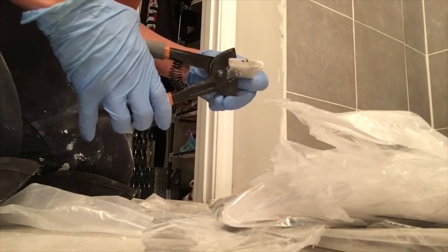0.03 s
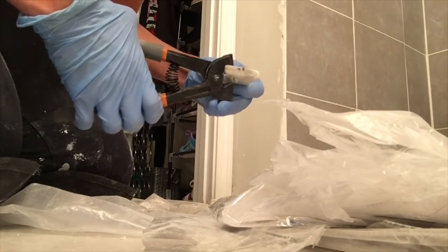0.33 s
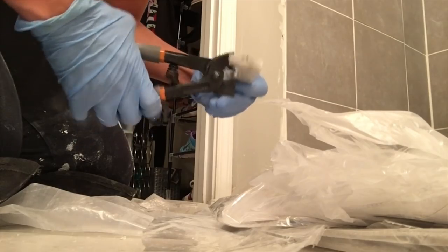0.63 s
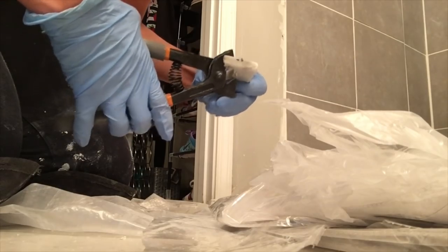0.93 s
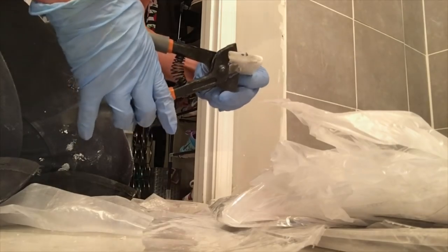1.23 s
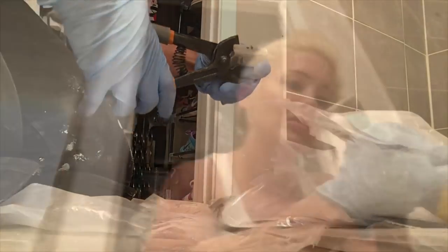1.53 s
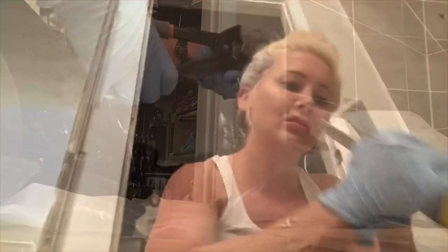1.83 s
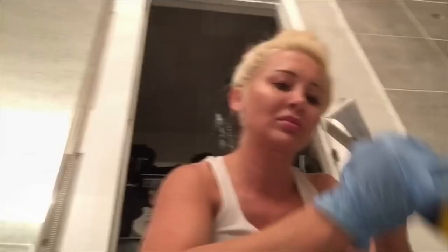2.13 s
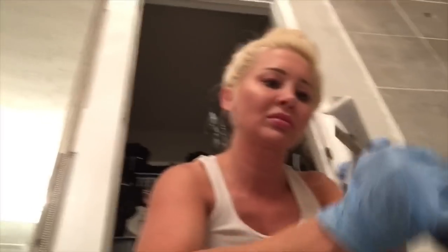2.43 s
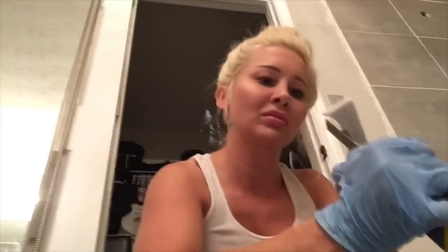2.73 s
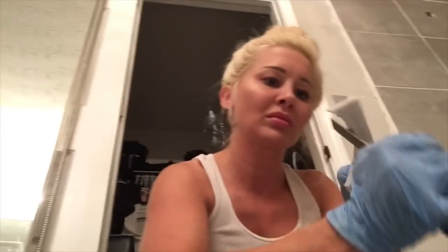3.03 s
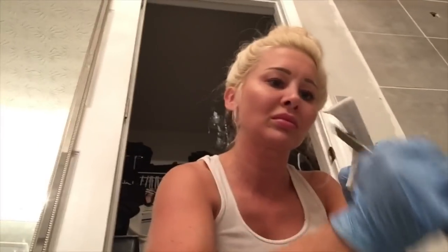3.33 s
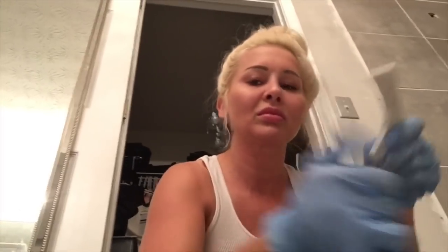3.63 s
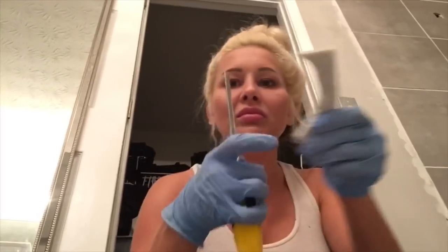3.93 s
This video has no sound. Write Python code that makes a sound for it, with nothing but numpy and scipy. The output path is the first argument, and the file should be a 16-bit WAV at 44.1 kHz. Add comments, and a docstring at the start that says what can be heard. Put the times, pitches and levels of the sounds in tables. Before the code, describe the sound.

A steel file rasps quickly back and forth on a hard piece after one sharp snap.

```python
"""Snip and file

Hand cutters snap a hard, brittle piece; a few crumbs tick and rubber gloves rustle.
Then a steel file rasps back and forth over it, about seven strokes a second, and knocks as it leaves.
Its teeth catch in grains that ring the piece and the blade; a small tiled room answers over a low air hum."""
import sys
import numpy as np
from scipy import signal
from scipy.fft import rfft, irfft
from scipy.io import wavfile
from scipy.ndimage import uniform_filter1d, map_coordinates

SR = 44100
rng = np.random.default_rng(int(sys.argv[2]) if len(sys.argv) > 2 else 0)


def waveform_to_disk(signal):
    """Save audio, clipped to [-1, 1], as 16-bit WAV at the path in sys.argv[1]."""
    frames = np.transpose(np.atleast_2d(signal))
    scaled = np.clip(frames, -1, 1) * 32767
    samples = np.round(scaled).astype(np.int16)
    wavfile.write(sys.argv[1], SR, samples)


N = 176400
TIME = np.arange(N) / SR


def amp(db):
    """Decibels to gain."""
    return 10 ** (np.asarray(db) / 20)


def unit(x):
    """Scale to rms 1."""
    return x / np.sqrt(np.mean(x ** 2) + 1e-20)


def along(points, hz):
    """Read a curve of (f/Hz, value) points on a log frequency axis."""
    f, values = np.transpose(points)
    return np.interp(np.log(hz + 1), np.log(f + 1), values)


def wobble(rate):
    """A smooth random modulator, rate knots a second."""
    return map_coordinates(rng.standard_normal(N), [np.arange(N) * rate / SR])


def decay(start, t60):
    """An envelope with instant attack and exponential decay."""
    age = TIME - start
    return (age >= 0) * amp(-60 * abs(age) / t60)


def filtered(x, response):
    """Apply a frequency response, scaled to keep the power of white noise."""
    h = response(np.fft.rfftfreq(2 * N, 1 / SR))
    return irfft(rfft(x, 2 * N) * h / np.sqrt(np.mean(abs(h) ** 2)))[:N]


def eq(x, points):
    """Minimum-phase EQ through (f/Hz, level/dB) points."""
    def response(hz):
        cepstrum = irfft(np.log(amp(along(points, hz))))
        return np.exp(rfft(2 * cepstrum[:N], 2 * N) - cepstrum[0])
    return filtered(x, response)


def resonate(x, modes, order=1):
    """A resonator bank of (f/Hz, width/Hz, level/dB) rows; order 2 has steeper skirts."""
    def response(f):
        return sum(amp(db) * (1j * f * width / (hz * hz - f * f + 1j * f * width)) ** order
                   for hz, width, db in modes)
    return filtered(x, response)


def shifted(x, by_hz):
    """Frequency shifter: slide a ring up or down, sample by sample."""
    return np.real(signal.hilbert(x) * np.exp(2j * np.pi * np.cumsum(by_hz) / SR))


def soft_contact(x, cutoff_hz=7070):
    """The contact is not perfectly hard, so the highest ringing is weak."""
    return signal.sosfilt(signal.butter(6, cutoff_hz, fs=SR, output="sos"), x)


# Room tone EQ: f/Hz, level/dB
AIR_EQ = [(20, -19), (35, -18), (55, -1.5), (75, -9.5), (110, -2), (155, -7), (185, -2.5), (240, -11.5),
          (380, -4), (550, -14.5), (900, -16), (1500, -21.5), (2300, -28), (4400, -31.5), (8000, -38),
          (16000, -46)]

def air(level_db=-57.5):
    """A steady bed of low, humming air."""
    return amp(level_db) * unit(eq(rng.standard_normal(N), AIR_EQ))


# Reverb time of the tiled room: f/Hz, t60/s
ROOM_DECAY = [(200, 0.21), (1000, 0.39), (3000, 0.39), (6000, 0.36), (9000, 0.31), (14000, 0.28)]

def room(x, tail_db, early_db=-8):
    """Near tiles throw early reflections; the tail lasts longest in the mids."""
    hz, t, spectrum = signal.stft(rng.standard_normal(SR), SR, nperseg=256)
    damping = amp(-60 * t / along(ROOM_DECAY, hz)[:, None])
    tail = signal.istft(spectrum * damping, SR, nperseg=256)[1][:SR]
    tail *= np.clip(TIME[:SR] / 0.0056, 0, 1)  # fade-in
    early = rng.standard_normal(SR) * (rng.random(SR) < .03) * decay(.002, t60=0.026)[:SR]
    impulse = amp(tail_db) * tail / np.linalg.norm(tail) + amp(early_db) * early / np.linalg.norm(early)
    return x + signal.fftconvolve(x, impulse)[:N]


# Glove moves: centre t/s, half length/s, level/dB, f/Hz
GLOVE_MOVES = [(0.185, .06, -75, 3480), (0.423, 0.022, -66, 6500), (0.788, 0.052, -62.5, 6800),
               (3.83, 0.051, -59.5, 800), (3.954, 0.041, -60.5, 4700)]

def gloves(crinkle_db=3, width_ratio=1.2):
    """Rubber gloves rustle in short swells of crinkly, band-passed noise."""
    crinkle = unit(rng.standard_normal(N) * amp(crinkle_db * wobble(400)))
    out = np.zeros(N)
    for centre, half, db, hz in GLOVE_MOVES:
        swell = amp(db) * np.exp(-((TIME - centre) / half) ** 2 / 2)
        out += swell * resonate(crinkle, [(hz, width_ratio * hz, 0)])
    return out


# Crumbs and small handling ticks: t/s, level/dB, f/Hz, t60/s
CRUMB_TICKS = [(0.1718, -47.5, 2780, 0.019), (0.197, -51.5, 1300, 0.021), (0.7297, -43, 1100, 0.027),
               (0.7741, -42, 4950, 0.0092), (0.777, -50.5, 910, 0.033), (0.815, -40.5, 4720, 0.0072),
               (.856, -45.5, 6600, 0.0084), (0.9657, -56, 7500, .008), (0.9825, -50, 5870, 0.0082),
               (1.0357, -57.5, 3020, 0.015), (3.8505, -60, 5500, .012), (3.867, -39, 5460, 0.0086),
               (3.9625, -46.5, 5130, .012)]

def crumbs(width_ratio=0.43):
    """Each tick is a tiny noise burst through one broad resonance."""
    return sum(resonate(rng.standard_normal(N) * amp(db) * decay(start, t60), [(hz, width_ratio * hz, 0)])
               for start, db, hz, t60 in CRUMB_TICKS)


# Jumps of the fracture: t/s, level/dB
FRACTURE_JUMPS = [(.556, -17.5), (0.5626, -2), (0.5649, 3.5), (.568, 3), (.573, 4.5)]
# Tone of the crack: f/Hz, level/dB
CRACK_EQ = [(120, -40), (250, -21), (380, -2), (650, -18), (900, -11), (1200, -2), (1650, -8),
            (2000, -10.5), (2500, -4.5), (3400, -14), (4200, -7), (5200, -5), (6300, -11.5), (7200, -18),
            (9300, -19.5), (10500, -29), (11600, -21), (15500, -33)]
# Ring of the steel cutters: f/Hz, level/dB, t60/s
CUTTER_MODES = [(1730, -5, .17), (2410, -11, .17), (4600, -5, .2), (5110, -2, .28), (5470, -4, 0.28),
                (6350, -1, .2)]

def snap(crack_db=-28, ring_db=-45):
    """The piece cracks in quick jumps; the cutters ring from the second one."""
    bursts = sum(amp(db) * decay(start, t60=0.0091) for start, db in FRACTURE_JUMPS)
    crack = eq(rng.standard_normal(N) * bursts, CRACK_EQ)
    onset = FRACTURE_JUMPS[1][0]
    ring = np.zeros(N)
    for hz, db, t60 in CUTTER_MODES:
        phase = 2 * np.pi * hz * (TIME - onset) + 1.5 * wobble(125.5)
        ring += amp(db) * decay(onset, t60) * np.sin(phase)
    return amp(crack_db) * crack + amp(ring_db) * ring


# Return strokes on which the file bends: t/s, level/dB
FILE_BENDS = [(1.52, -12), (1.79, -18), (2.04, -2), (2.31, -2), (2.572, 1), (3.385, -2)]

def bending(level_db=-42, length_s=.072, from_hz=1250, to_hz=680):
    """The file bends with a rough, hollow tone that sinks as the contact slides along it."""
    rough = wobble(520) + 1j * wobble(520)
    out = np.zeros(N)
    for start, db in FILE_BENDS:
        progress = np.clip((TIME - start) / length_s, 0, 1)
        hz = from_hz * (to_hz / from_hz) ** progress
        tone = np.real(rough * np.exp(2j * np.pi * np.cumsum(hz) / SR))
        out += amp(level_db + db) * np.sin(np.pi * progress) * tone
    return out


# Hits of the file on the piece: t/s, level/dB
KNOCK_HITS = [(2.153, -8), (3.345, -3.5), (3.6398, 5)]
# Body of a knock: f/Hz, width/Hz, level/dB
KNOCK_BODY = [(1133.9, 130, 1.5), (1820, 300, -6), (2786, 270, 3.5), (5201, 1600, -10.5), (7996, 680, -19)]

def knocks(level_db=-3.5):
    """Single hard catches of the file, the last as it comes off the piece."""
    blows = np.zeros(N)
    for start, db in KNOCK_HITS:
        blows[round(start * SR)] = amp(db + level_db)
    return soft_contact(resonate(blows, KNOCK_BODY))


# Momentary snags of the teeth: centre t/s, level change/dB
TOOTH_SNAGS = [(1.53, 11), (1.69, 7.5), (1.801, 6.5), (1.85, 1), (1.976, 2), (2.213, 8), (2.527, 3.5),
               (2.782, -1), (2.88, 0.5), (3.152, 4.5), (3.402, 7), (3.585, 1.5)]

def tooth_force(speed, tooth_hz=4798, grains_per_s=6000, grit_share=0.66, snag_s=0.0019):
    """The exciter: random grit plus tooth clicks that come faster as the file speeds up."""
    grains = (rng.random(N) < grains_per_s / SR) * np.sign(rng.standard_normal(N))
    grit = unit(grains * amp(3.5 * rng.standard_normal(N)))
    tooth_rate = tooth_hz * (.15 + speed) * amp(.8 * wobble(150))
    teeth_passed = np.floor(np.cumsum(tooth_rate) / SR + .22 * wobble(3000))  # with timing jitter
    clicks = np.diff(teeth_passed, prepend=teeth_passed[0]) * amp(3.4 * rng.standard_normal(N))
    teeth = unit(clicks - uniform_filter1d(clicks, size=64))  # low cut
    catch_and_slip = unit(amp(1.5 * wobble(260)))
    snag_db = sum(db * np.exp(-((TIME - centre) / snag_s) ** 2 / 2) for centre, db in TOOTH_SNAGS)
    return (np.sqrt(grit_share) * grit + np.sqrt(1 - grit_share) * teeth) * catch_and_slip * amp(snag_db)


# File strokes: start t/s, fastest t/s, end t/s, squeal f/Hz, level/dB,
# then layer trims: squeal/dB, chatter/dB, bite/dB, fizz/dB, blade/dB
FILE_STROKES = [(1.268, 1.334, 1.444, 4440, -21.5, 2, 0, -10, 0, 0),
                (1.405, 1.467, 1.524, 4540, -12, 3, 1, 6.5, 1.5, 0),
                (1.51, 1.573, 1.663, 4455, -10, 3.5, -0.5, -14, -3, 0.5),
                (1.67, 1.728, 1.783, 4495, -6.5, 4.5, 2, 8.5, -1, -0.5),
                (1.781, 1.853, 1.903, 4430, -3, 3.5, 2, -23, -4.5, -2),
                (1.913, 1.986, 2.033, 4515, -2, 4, -1.5, 7.5, 1, -1),
                (2.035, 2.104, 2.2, 4465, -2.5, 3, -4, -8, 0, 0),
                (2.196, 2.254, 2.303, 4495, -0.5, 4, 5, 12.5, -1, -1),
                (2.306, 2.373, 2.446, 4420, -1, 2.5, -8, -13, -1, 1),
                (2.462, 2.52, 2.547, 4480, 1, 3.5, 2, -2, -1, 0),
                (2.565, 2.615, 2.71, 4390, -2.5, -1, -7, 0, -1, 0.5),
                (2.754, 2.797, 2.822, 4500, -1, 3, -1.5, -3, 1.5, -1.5),
                (2.854, 2.905, 2.94, 4415, -5.5, 4, 1.5, -19, 3, 3),
                (3.009, 3.055, 3.095, 4505, -2, 3, 2, 5, 6, 3),
                (3.133, 3.181, 3.238, 4470, -1.5, 3, -5, -19, -1.5, 1),
                (3.263, 3.326, 3.36, 4510, -0.5, 0.5, 2.5, 5, 3, 1),
                (3.383, 3.462, 3.506, 4480, -1.5, 5.5, 5.5, -6, 1.5, 1.5),
                (3.53, 3.58, 3.646, 4420, 1.5, 3, 2, -8, 4, -2.5),
                (3.591, 3.625, 3.642, 4420, -1.5, -15, 9.5, -3, 1, 8)]
# Broadband rasp: f/Hz, level/dB
RASP_EQ = [(150, -43), (350, -17.5), (620, -5), (900, -11), (1300, 6), (1800, -0.5), (2200, -2), (2800, 1),
           (3400, 1.5), (4100, -2), (5000, -8.5), (6200, -18.5), (7500, -24.5), (8400, -7), (9500, -15.5),
           (10500, -26.5), (11600, -45), (13500, -23), (16000, -34)]
# Narrow squeal, midrange chatter, bright bite and top-end fizz: f/Hz, width/Hz, level/dB
SQUEAL_MODES = [(4440, 118, 32), (4530, 150, -22), (4480, 150, -17)]
CHATTER_MODES = [(690, 480, -11), (1200, 60, -4), (1324, 300, 2), (1775, 104, 3)]
BITE_MODES = [(5250, 850, -3.5), (5715, 420, -1.1)]
FIZZ_MODES = [(12150, 830, -3.5), (12390, 400, 0)]
# Partials of the file blade: f/Hz
BLADE_PARTIALS = [2750, 2890, 2973, 5425, 6550, 6925]
# Peak of each of those partials: width/Hz, level/dB
BLADE_PEAKS = [(255, -4.5), (170, -6.5), (20, -5), (60, -8.5), (26, 0.5), (91, 0.5)]

def filing(squeal_centre_hz=4470):
    """Each stroke speeds up and stops; teeth and grit hit harder with speed and ring piece and blade."""
    speeds = [np.sin(np.pi / 2 * np.interp(TIME, row[:3], [0, 1, 0])) for row in FILE_STROKES]
    _, fastest, _, squeal_hz, stroke_db, *trims = np.array(FILE_STROKES).T
    squeal_db, chatter_db, bite_db, fizz_db, blade_db = trims
    force = tooth_force(sum(speeds))

    def drive(db, power):
        """One layer's send; a higher power of speed tightens it around the fastest moment."""
        return force * sum(gain * speed ** power for gain, speed in zip(amp(stroke_db + db), speeds))

    rasp = eq(drive(-37.5, power=1.24), RASP_EQ)
    squeal = resonate(drive(squeal_db - 30, power=1.44), SQUEAL_MODES)
    squeal = shifted(squeal, np.interp(TIME, fastest, squeal_hz) - squeal_centre_hz)
    chatter = resonate(drive(chatter_db - 44, power=0.86), CHATTER_MODES)
    bite = resonate(drive(bite_db - 45, power=1.75), BITE_MODES)
    blade_modes = [(hz, *peak) for hz, peak in zip(BLADE_PARTIALS, BLADE_PEAKS)]
    blade = resonate(drive(blade_db - 38.5, power=0.62), blade_modes)
    fizz = resonate(drive(fizz_db - 50.5, power=1.24), FIZZ_MODES, order=2)
    return rasp + soft_contact(squeal + chatter + bite + blade) + fizz


def scene():
    """Mono mix: file, snap and handling, each with its own reverb send, over the air."""
    bed = air()
    file_work = room(filing() + bending() + knocks(), tail_db=-10)
    cut = room(snap(), tail_db=-6.5)
    handling = room(crumbs() + gloves(), tail_db=-12.5)
    return (bed + handling + cut + file_work)[None]


def record(dry):
    """Brick-wall high cut at 16 kHz."""
    passband = np.fft.rfftfreq(2 * N, 1 / SR) < 16000
    return irfft(rfft(dry, 2 * N) * passband)[:, :N]


dry = scene()
out = record(dry)
waveform_to_disk(out)
```